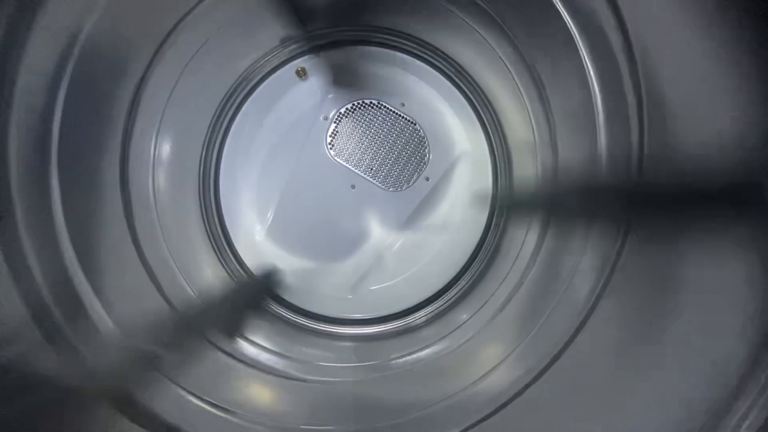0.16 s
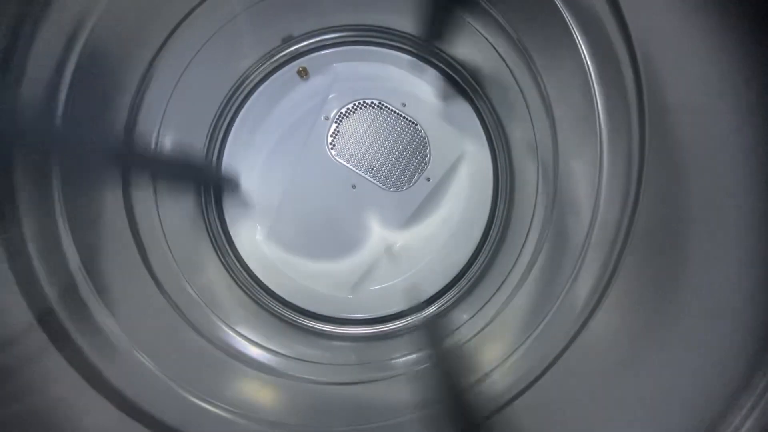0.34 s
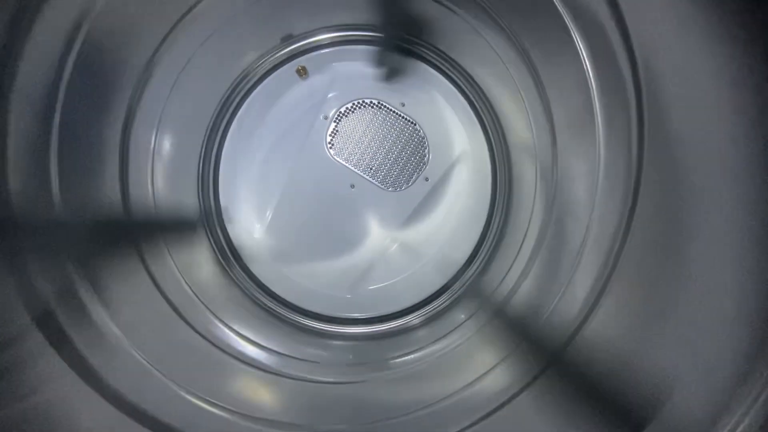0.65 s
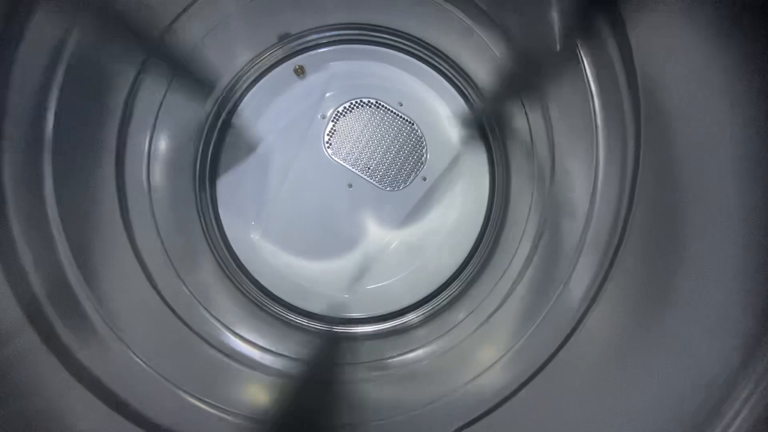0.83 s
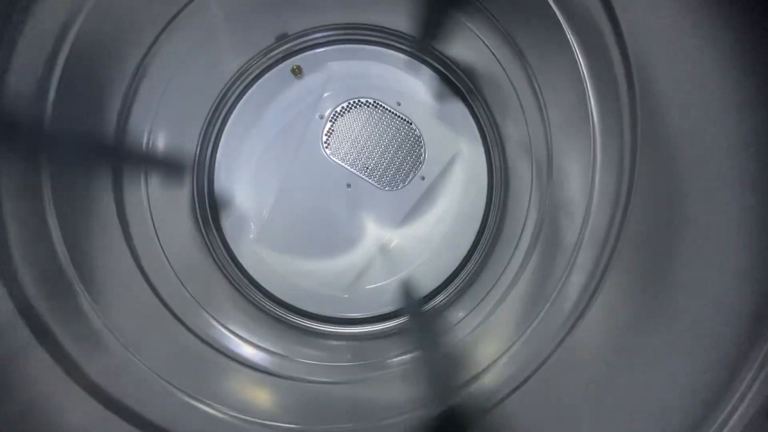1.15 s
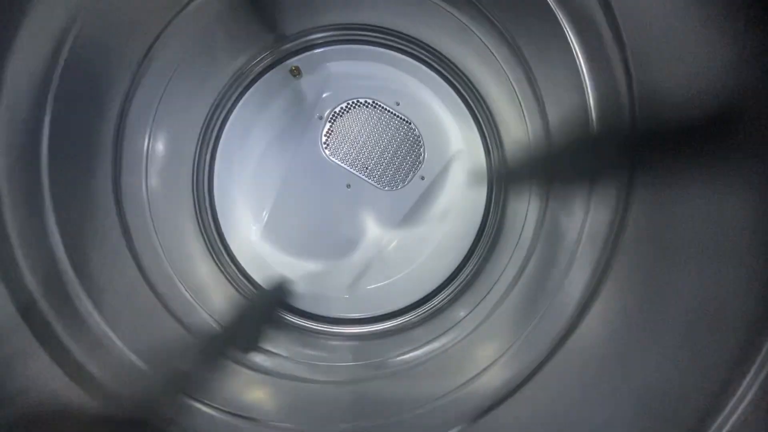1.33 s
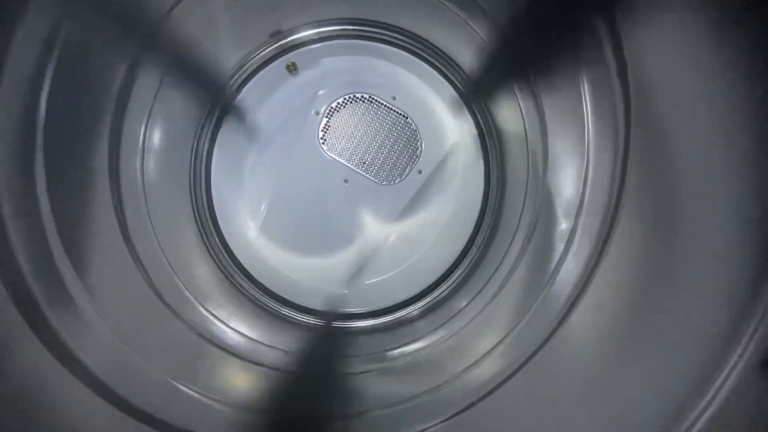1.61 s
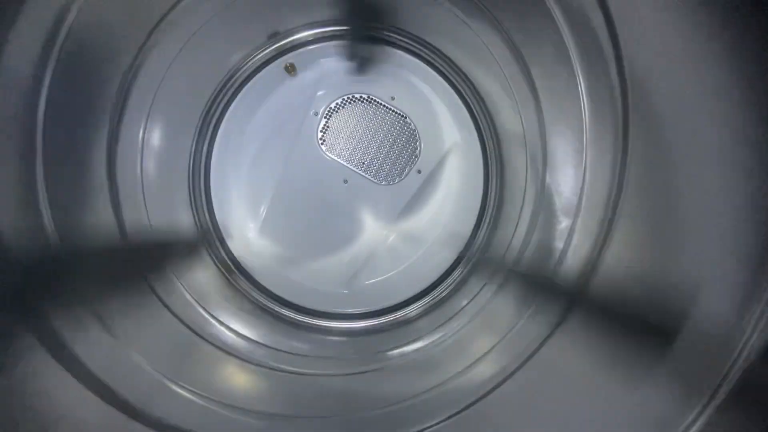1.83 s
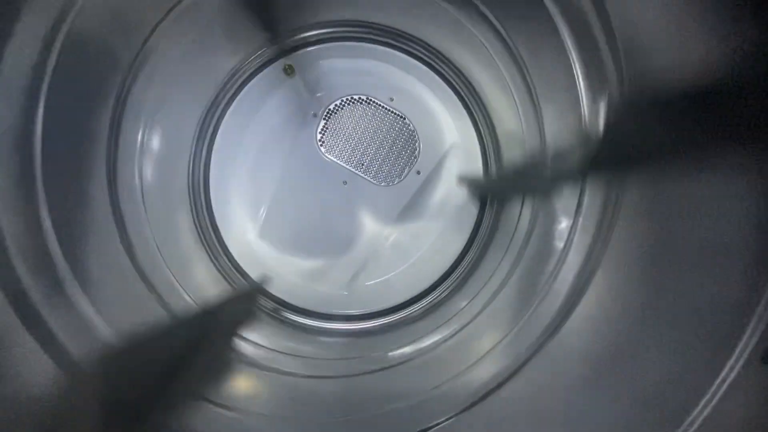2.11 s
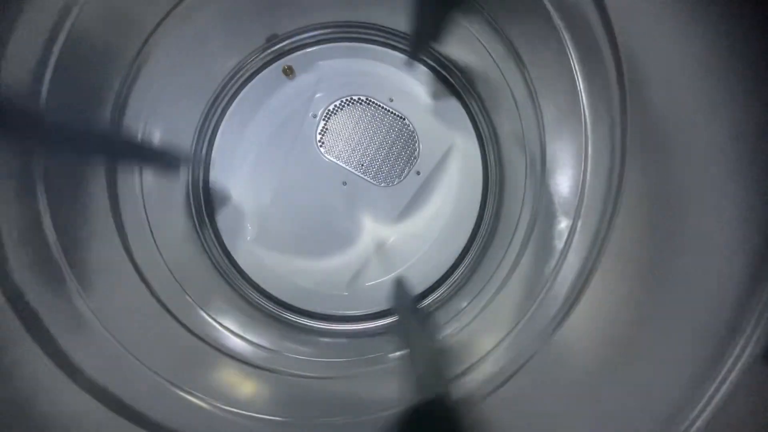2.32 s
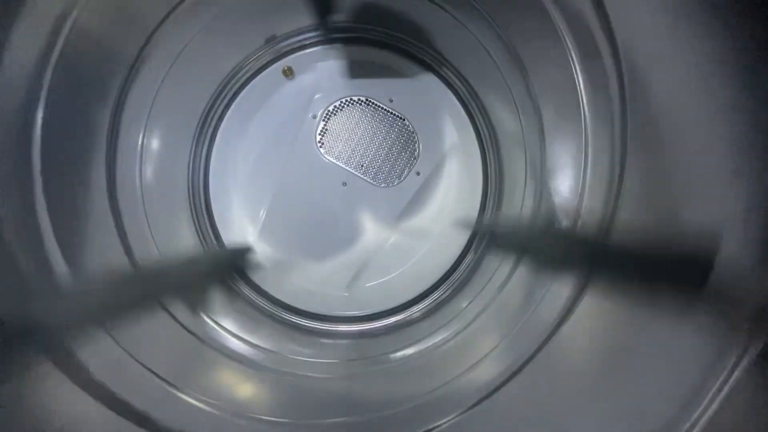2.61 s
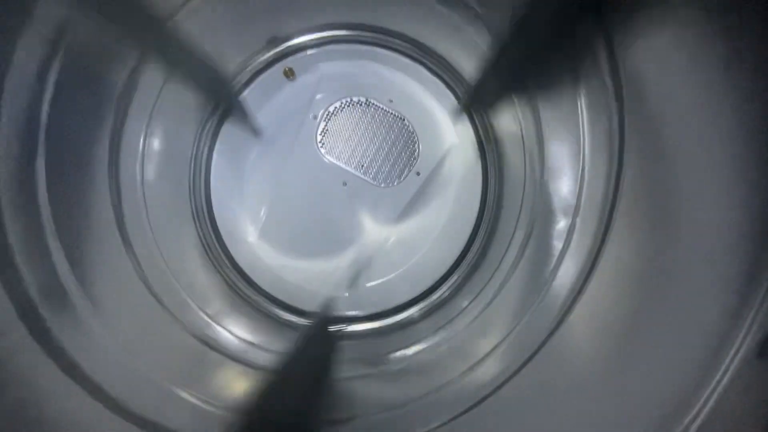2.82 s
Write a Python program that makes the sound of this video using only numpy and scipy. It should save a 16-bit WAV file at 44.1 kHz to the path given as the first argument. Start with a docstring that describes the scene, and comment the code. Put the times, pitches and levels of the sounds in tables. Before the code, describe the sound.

An empty clothes dryer turns, heard close inside its steel drum. Low motor hum and wavering whirr sit under a rolling rumble that builds over the first 0.3 seconds, with faint hiss. Around 0.14 seconds the drum groans and thin metal rattles brightly, fading by 0.5. Dull knocks follow at 0.5 and 0.8, soft thumps cluster around 1.1-1.4, sharp clacks at 2.15-2.3, and low thumps near 2.5.

```python
"""Inside a turning clothes dryer

An empty clothes dryer turns, heard from inside its steel drum. Wavering tones make the motor's hum and whirr.
Shaped noise makes a rolling rumble that builds up, swells at each bump, and has a faint hiss over it.
The drum groans briefly on a sagging tone, and thin metal is brushed, then rattles once: noise and high tones.
The vanes knock and tick with short, gritty rings, and the drum wall thumps with low, fading sines."""
import sys
import numpy as np
from scipy import signal
from scipy.fft import irfft
from scipy.io import wavfile
from scipy.ndimage import uniform_filter1d

SR = 44100
rng = np.random.default_rng(int(sys.argv[2]) if len(sys.argv) > 2 else 0)


def unload_audio(sound):
    """Save the sound as a 16-bit wav file, at the path given as the first command line argument."""
    columns = np.transpose(np.atleast_2d(sound))
    # keep every value between -1 and 1, then stretch to whole-number steps
    steps = np.round(np.clip(columns, -1, 1) * 32767)
    wavfile.write(sys.argv[1], SR, steps.astype(np.int16))


N = 130536
t = np.arange(N) / SR  # time in s
HUM_HZ = 120.0


def undb(db):
    """Turn decibels into a gain."""
    return 10 ** (np.asarray(db) / 20)


def unit(x):
    """Scale a signal to rms 1."""
    return x / np.sqrt(np.mean(x ** 2))


def walk(rate):
    """Slow random wandering around 0, spread near 1: levels held for 1 / rate s, then smoothed twice."""
    k = int(SR / rate)
    steps = np.repeat(rng.standard_normal(N // k + 1), k)
    smooth = uniform_filter1d(uniform_filter1d(steps, k), k)
    return unit(smooth[:N])


def noise(points, notch=0):
    """Noise of rms 1 with a (Hz, dB) colour, steep below its lowest point; the notch leaves room for the hum."""
    notch_width_hz = 12.5
    f = np.arange(N // 2 + 1) * SR / N + 1  # the 1 avoids log(0)
    hz, db = np.array(points).T
    gain = undb(np.interp(np.log(f), np.log(hz), db)) * np.minimum(f / hz[0], 1) ** 5
    gain = gain * (1 - notch * np.exp(-((f - HUM_HZ) / notch_width_hz) ** 2))
    random_phase = np.exp(2j * np.pi * rng.random(len(f)))
    return unit(irfft(gain * random_phase, N))


def tone(hz):
    """A sine of rms 1 that follows a moving pitch."""
    return np.sqrt(2) * np.sin(2 * np.pi * (np.cumsum(hz) / SR + rng.random()))


def envelope(start, attack, hold, release):
    """Straight rise, then exponential fall with time constant release; hold counts from the start."""
    rise = np.clip((t - start) / attack, 0, 1)
    return rise * np.exp(-np.maximum(t - start - hold, 0) / release)


def motor():
    """Mains hum, firmer under the first strain, with the wavering whirr of the turning parts."""
    # motor hum: [multiple of the hum pitch, running level/dB, extra level under strain/dB]
    hum_parts = [(1, -38, 1), (2, -53.5, 8.5), (3, -48, 13.5), (4, -63.5, -4), (5, -64, 3)]
    # whirring tones of the motor and blower: [f/Hz, middle level/dB]
    whirr_tones = [(310, -55.5), (409, -55.5), (446, -57.5), (520, -58.5)]
    strain_end_s, strain_fade_s = 0.15, 0.12
    strain = np.exp(-np.maximum(t - strain_end_s, 0) / strain_fade_s)
    pitch = HUM_HZ * (1 + 0.0042 * walk(12))
    out = np.zeros(N)
    for multiple, db, extra in hum_parts:
        # the waver shrinks to nothing midway through the fade, then grows back
        waver = 2.5 * (0.5 - strain) * walk(14)
        out += tone(multiple * pitch) * undb(db + extra * strain + waver)
    for hz, db in whirr_tones:
        out += tone(hz * (1 + 0.00593 * walk(9))) * undb(db + 3.7 * walk(8.63))
    return out


def drum():
    """Rolling noise that builds up at first, added noise at each bump, and the faint hiss of the seal."""
    # colour of the rolling noise: [f/Hz, relative level per Hz/dB]
    roll_colour = [(52, -10), (68, 1), (100, -0.5), (135, 0), (160, -13.5), (198, -5), (260, -12.5),
                   (320, -9), (380, -16), (480, -16), (620, -21), (860, -24.5), (1100, -31.5), (1500, -32),
                   (2000, -36.5), (2700, -41), (4000, -53.5), (8000, -64), (16000, -70)]
    # colour of the noise of a bump: [f/Hz, relative level per Hz/dB]
    bump_colour = [(56, -12), (70, 2.5), (135, -0.5), (200, -1.5), (330, -13), (480, -16.5), (800, -25),
                   (1400, -35.5), (2600, -41), (4000, -48.5), (8000, -58), (13000, -54), (16000, -71)]
    # bumps of the drum: [start t/s, time from start to fall/s, level/dB]
    bumps = [(0.139, 0.04, -34), (0.213, 0.11, -39.5), (0.488, 0.031, -36.5), (1.079, 0.081, -30.5),
             (1.261, 0.18, -34), (1.925, 0.065, -36.5), (2.262, .11, -30.5), (2.474, 0.12, -33.5)]
    # colour of the rim sliding on its seal: [f/Hz, relative level per Hz/dB]
    seal_colour = [(2500, 9), (3500, 2), (5000, 0), (8000, -3.5), (11000, -2), (13500, -1.5), (16000, -9)]
    # course of the seal's hiss: [t/s, middle level/dB]
    seal_level = [(.05, -65.5), (.4, -62), (.62, -66.5), (.85, -64.5), (1.02, -68.5), (1.14, -63),
                  (1.37, -63.5), (1.8, -67.5), (2.0, -67), (2.36, -64), (2.6, -65), (2.8, -69)]
    roll_db, start_dip_db, build_up_s, flicker_db = -37, -7.5, 0.18, 1.4
    level = roll_db + start_dip_db * np.exp(-t / build_up_s) + flicker_db * walk(25.24)
    roll = noise(roll_colour, notch=0.76) * undb(level)
    attack_s, release_s = 0.015, 0.045
    load = sum(undb(db) * envelope(start, attack_s, length, release_s) for start, length, db in bumps)
    hiss_db = np.interp(t, *np.array(seal_level).T) + 1.7 * walk(68)
    return roll + load * noise(bump_colour) + noise(seal_colour) * undb(hiss_db)


def groan():
    """The drum rubs on its seal: a sagging, unsteady tone with overtones swells and fades."""
    # overtones of the groan: [multiple of its pitch, level at the peak/dB]
    overtones = [(2, -42), (3, -52), (4, -52.5), (5, -61), (6, -60.5)]
    peak_s, width_s, peak_hz, sag_hz_per_s = 0.144, 0.085, 172.6, 30.5
    pitch = (peak_hz - sag_hz_per_s * (t - peak_s)) * (1 + 0.0157 * walk(31.7))
    swell = np.exp(-((t - peak_s) / width_s) ** 2 / 2)
    return swell * sum(undb(db) * tone(multiple * pitch) for multiple, db in overtones)


def rattle():
    """Thin metal is brushed, then sizzles as fading noise and rings out in many high tones."""
    # colour of the sizzle: [f/Hz, relative level per Hz/dB]
    sizzle_colour = [(750, -5.5), (1050, -5.5), (1250, -10), (1540, -11.5), (1900, -6.5), (2790, 0),
                     (3790, -3), (4650, 3.5), (5900, -3), (7900, -2), (10400, 3.5), (12200, 2), (13900, 2),
                     (16000, -16)]
    # ringing of the thin metal: [f/Hz, relative level/dB]
    sheet_tones = [(1000, -16), (1540, -14), (1890, -15), (2160, -12), (2815, -8), (3640, -9), (4280, -10),
                   (4943, -4), (6734, -4), (8402, -4), (8861, -6), (10070, -15), (10482, -12), (11211, 3.5),
                   (11606, 1), (11847, 1), (12401, -6), (13108, -10), (13455, -16), (13612, 1), (15120, -4)]
    start_s, attack_s, hold_s, split_hz = 0.1358, 0.0038, 0.024, 5300
    low_t60_s, high_t60_s, ring_t60_s = 0.37, 0.23, 0.26  # time to fall by 60 dB
    scuff_db, sizzle_db, ring_db = -51, -28, -39.5

    def fall(hold, t60):
        """The rattle's rise, then a fall of 60 dB in t60 s."""
        return envelope(start_s, attack_s, hold, t60 / np.log(1000))

    source = noise(sizzle_colour)
    scuff = undb(scuff_db) * envelope(0.047, 0.09, 0.1, 0.04) * source
    low = signal.sosfilt(signal.butter(1, split_hz, fs=SR, output="sos"), source)
    high = source - low  # the upper sizzle dies sooner
    sizzle = low * fall(hold_s, low_t60_s) + high * fall(hold_s, high_t60_s)
    sizzle = sizzle * undb(sizzle_db + 0.85 * walk(340))
    ring = np.zeros(N)
    for hz, db in sheet_tones:
        ring += undb(ring_db + db + 1.5 * walk(49)) * tone(hz * (1 + 0.0018 * walk(177)))
    return scuff + sizzle + ring * fall(0, ring_t60_s)


def knocks():
    """Short, gritty contacts ring the vanes; each has its own share of thud, clack and tick."""
    # knocks and ticks, before the ring levels: [t/s, thud level/dB, unused level/dB, clack level/dB, tick level/dB]
    hits = [(0.098, -41, -47, -40, -34), (.235, -45.5, -45, -52, -53), (.387, -44, -54, -54, -70),
            (0.499, -28, -43.5, -46.5, -54), (0.5267, -53, -39, -43.5, -39.5), (.789, -33, -50, -57, -57),
            (.828, -47, -55, -57, -59), (.965, -44, -48, -49, -70), (1.19, -40, -38.5, -47.5, -34),
            (1.197, -40, -49, -51, -41.5), (1.306, -37, -40.5, -47, -53), (1.314, -42, -39.5, -51.5, -53),
            (1.3778, -57, -63, -57, -54), (1.4293, -44, -33.5, -41.5, -56), (1.584, -35, -52, -57, -49.5),
            (1.913, -40, -46, -51.5, -70), (1.937, -37, -46.5, -52, -70), (1.972, -42, -43, -53.5, -70),
            (2.045, -61, -48, -49.5, -41.5), (2.108, -40, -48.5, -55.5, -62), (2.154, -50, -51, -35.5, -31),
            (2.1921, -34, -25.5, -29, -31.5), (2.271, -50, -55, -37.5, -26), (2.368, -61, -45.5, -66, -56),
            (2.491, -54, -50, -47.5, -56), (2.509, -32, -41, -61, -46), (2.5382, -45, -57, -64, -54),
            (2.639, -55, -60, -60, -52)]
    # rings of a vane: [f/Hz, relative level/dB, time to fall 60 dB/s, part (rounds to 0 thud, +-2 clack, 3 tick)]
    vane_rings = [(330, -5, 0.026, -0.5), (500, -5.5, 0.02, -1.5), (683, -9, 0.022, 0.5),
                  (945, -4, 0.019, 1.5), (1333, -5.5, 0.021, 1.5), (1579, -3.5, 0.015, 1.5),
                  (2084, -4, 0.011, 1.5), (2576, -1.5, 0.013, 2), (3230, -1, 0.0082, 2),
                  (3790, -5, 0.0092, 2), (5500, -13, 0.0027, 3), (6440, -7.5, 0.0061, 3),
                  (7320, -7, 0.0048, 3), (8970, 0.5, 0.0047, 3), (10830, 1, 0.0036, 3),
                  (11800, 0.5, 0.0038, 3), (13430, -7, 0.0036, 3)]
    boost_db, contact_s, grit_share, detune, grit_width = 8.5, 0.00083, 0.72, 0.031, 0.35
    out = np.zeros(N)
    age = t[:SR // 20]  # each knock lasts 1/20 s
    for start, *part_levels in hits:
        i = int(start * SR)
        for k, (hz, db, t60, part) in enumerate(vane_rings):
            phase = 2 * np.pi * hz * (1 + detune * rng.standard_normal()) * age
            # slow noise roughens each ring
            lowpass = signal.butter(2, hz * grit_width, fs=SR, output="sos")
            grit = grit_share * unit(signal.sosfilt(lowpass, rng.standard_normal(len(age))))
            decay = (1 - np.exp(-age / contact_s)) * np.exp(-np.log(1000) * age / t60)
            gain = undb(boost_db + db + part_levels[abs(round(part))])
            # every second ring starts the other way round
            out[i:i + len(age)] += gain * decay * ((-1) ** k * np.sin(phase) + grit * np.cos(phase))
    return out


def thumps():
    """The drum wall flexes with a soft, low thump: three fading sines around a pitch given for each thump."""
    # low thumps of the drum wall, before the ring levels: [start t/s, level/dB, f/Hz]
    wall_hits = [(0.173, -23.5, 85), (0.462, -25, 106), (0.789, -22, 131), (1.088, -22, 135),
                 (1.13, -20, 156), (1.17, -28, 111), (1.253, -25, 86), (1.3, -17, 110), (1.345, -26, 103),
                 (1.37, -27, 86), (2.283, -25, 130), (2.339, -25, 136), (2.395, -26, 103),
                 (2.495, -24, 117), (2.528, -20, 90), (2.564, -21, 118), (2.595, -20, 119),
                 (2.894, -30, 85)]
    # what a thump rings with: [multiple of its pitch, relative level/dB, time to fall 60 dB/s]
    wall_rings = [(.68, -7, 0.06), (1, -2.5, 0.091), (2.2, -18, 0.036)]
    out = np.zeros(N)
    for start, db, hz in wall_hits:
        for ratio, ring_db, t60 in wall_rings:
            shape = envelope(start, 0.0048, 0.0053, t60 / np.log(1000))
            out += undb(db + ring_db) * shape * np.sin(2 * np.pi * hz * ratio * (t - start))
    return out


def scene():
    """Everything sounds together, close by inside the drum."""
    return (motor() + drum() + groan() + rattle() + knocks() + thumps())[None]


def record(dry):
    """The recorder drops the deepest bass and cuts the top."""
    bass_hz, top_hz = 45, 16000
    dry = signal.sosfilt(signal.butter(4, bass_hz, "high", fs=SR, output="sos"), dry)
    return signal.sosfilt(signal.ellip(8, .2, 70, top_hz, fs=SR, output="sos"), dry)


dry = scene()
out = record(dry)
unload_audio(out)
```